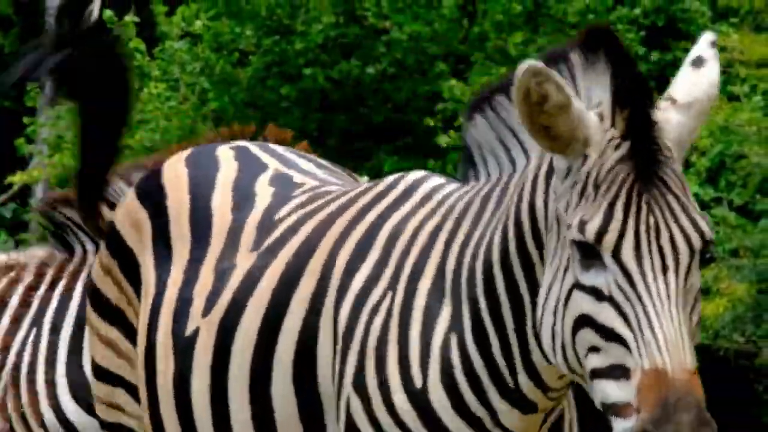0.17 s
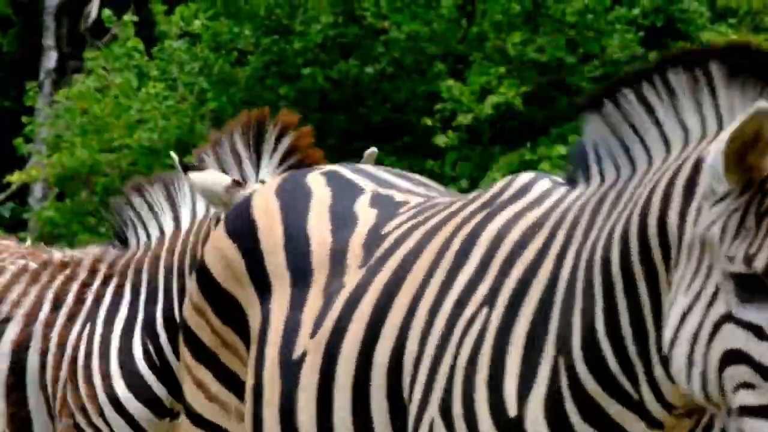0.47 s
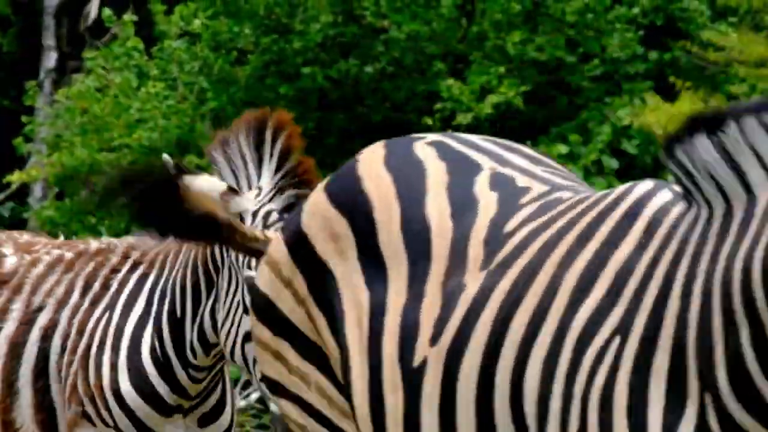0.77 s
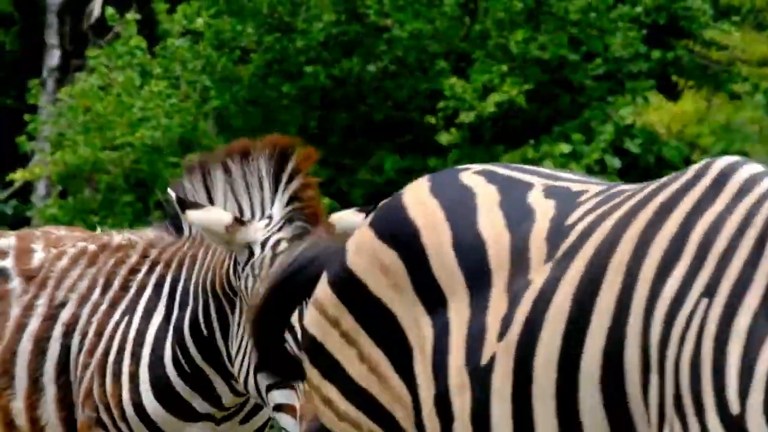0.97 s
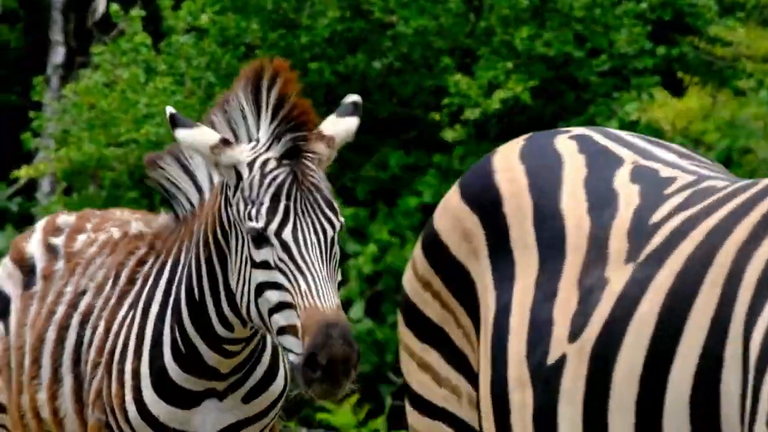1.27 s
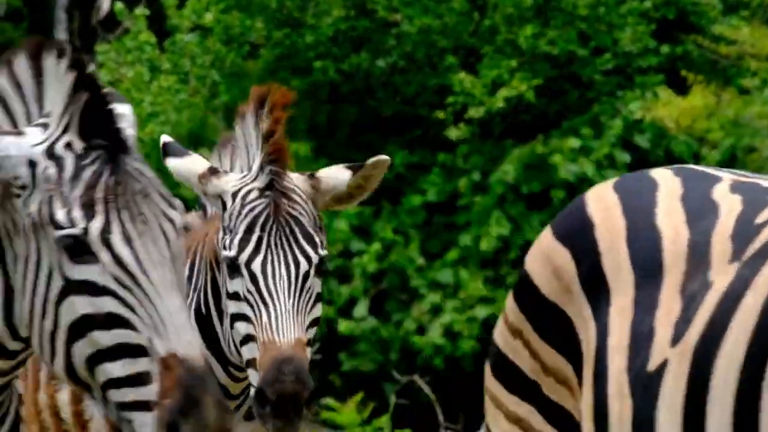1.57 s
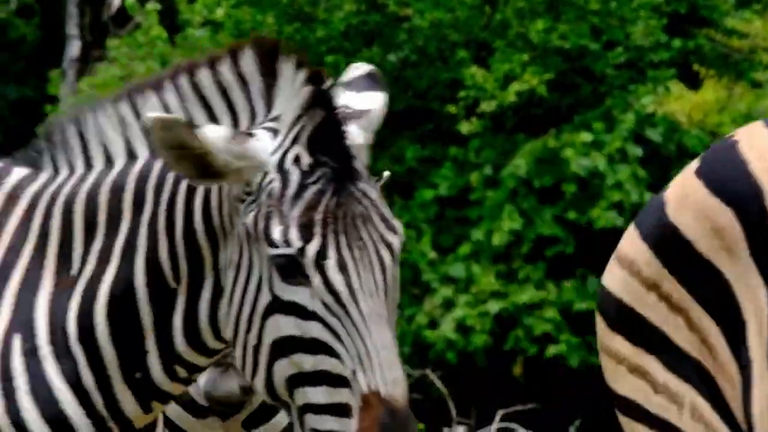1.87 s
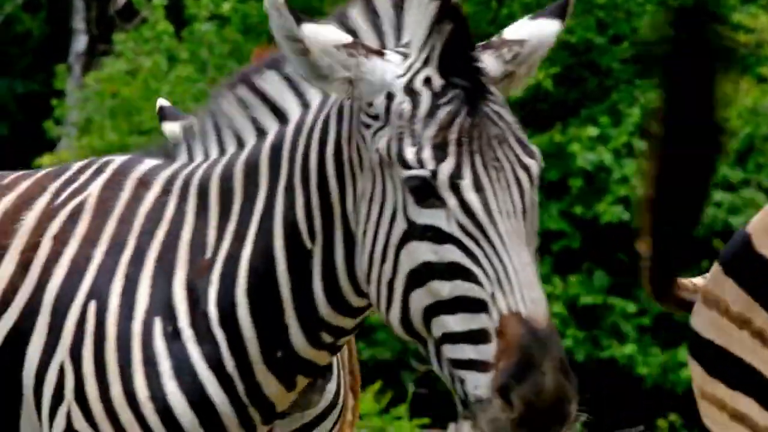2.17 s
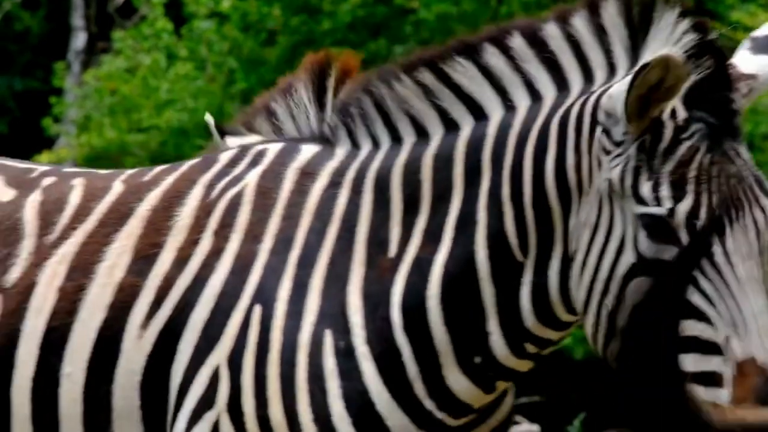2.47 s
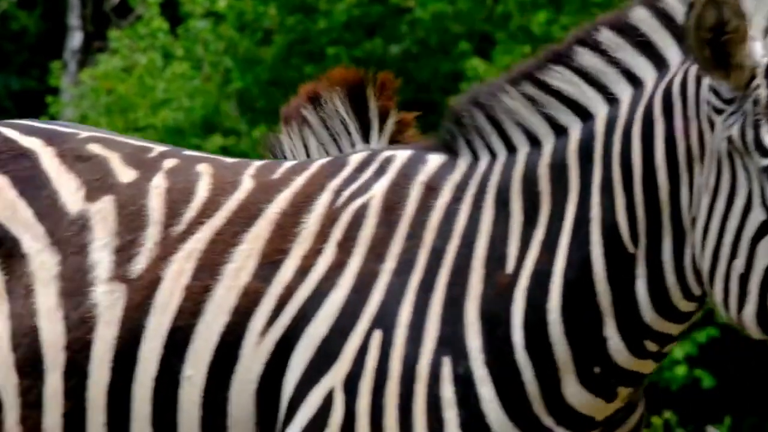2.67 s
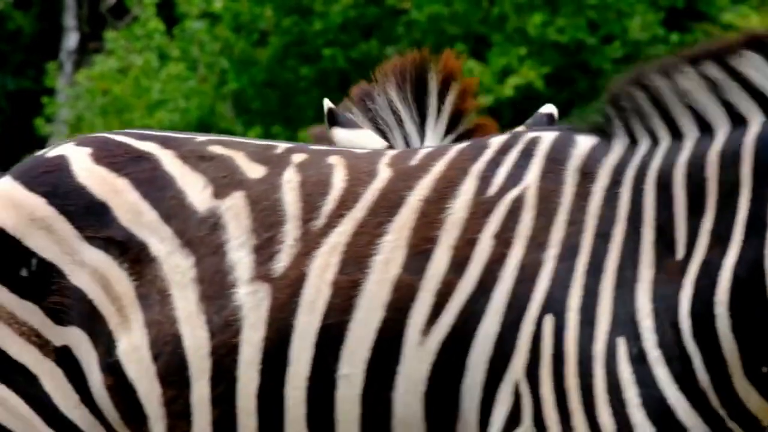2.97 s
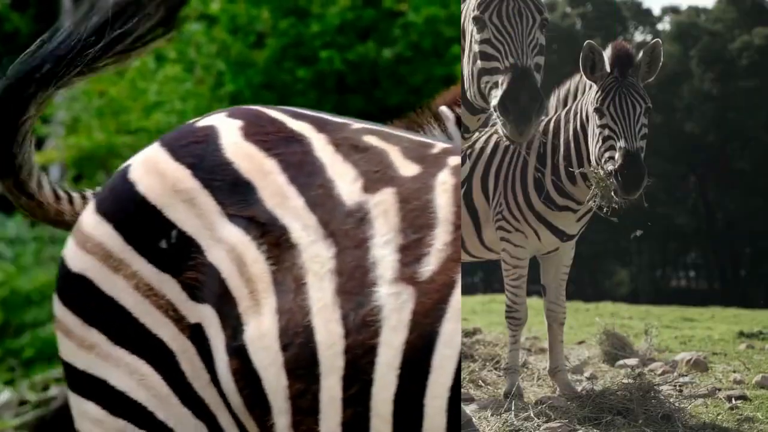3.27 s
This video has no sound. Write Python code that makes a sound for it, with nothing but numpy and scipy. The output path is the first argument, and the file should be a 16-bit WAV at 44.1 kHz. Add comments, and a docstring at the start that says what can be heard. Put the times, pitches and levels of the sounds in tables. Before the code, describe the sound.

Zebras give quick, high barks outdoors, straight ahead of the microphone. Each starts hoarse, swoops up, then fades or drops. The runs pause briefly and resume, sometimes overlapping, while small birds chirp far off over a soft hiss.

```python
"""Zebras bark outdoors in quick, overlapping runs. Each bark is a nearly pure tone that starts
hoarse, swoops up as much as an octave, holds, then fades or drops. Its overtones tear into noise
where the voice is rough, and a few barks carry a low grunt. The surroundings echo and ring a
little; small birds chirp far off over a soft hiss."""
import sys
import numpy as np
from scipy import signal
from scipy.fft import rfft, irfft, next_fast_len
from scipy.io import wavfile
from scipy.ndimage import uniform_filter1d, map_coordinates

SR = 44100
rng = np.random.default_rng(int(sys.argv[2]) if len(sys.argv) > 2 else 0)


def materialize(psi):
    """Save the field psi as 16-bit PCM at rate SR to the path in sys.argv[1].

    A 1-D psi becomes a single channel; in a 2-D psi each row is a channel.
    """
    bounded = np.clip(np.atleast_2d(psi).T, -1, 1)
    quanta = np.round(bounded * 32767).astype(np.int16)
    wavfile.write(sys.argv[1], SR, quanta)


N = 152145
T = np.arange(N) / SR


def amp(db):
    """dB to gain."""
    return 10 ** (np.asarray(db) / 20)


def unit(x):
    """Scale to rms 1."""
    return x / np.sqrt(np.mean(x ** 2) + 1e-20)


def along(points, hz):
    """Interpolate (freq_hz, value) rows on a log axis."""
    freq_hz, value = np.transpose(points)
    return np.interp(np.log(hz + 1), np.log(freq_hz + 1), value)


def wobble(knots_per_s):
    """Smooth random curve."""
    return map_coordinates(rng.standard_normal(4096), [T * knots_per_s], mode="wrap")


def filtered(x, response):
    """Apply the gain response(hz)."""
    size = next_fast_len(N + SR // 2)
    return irfft(rfft(x, size) * response(np.fft.rfftfreq(size, 1 / SR)), size)[..., :N]


def noise(response):
    """Coloured noise, rms 1."""
    return unit(filtered(rng.standard_normal(N), response))


def swell(start_s, length_s):
    """Smooth rise and fall."""
    return np.sin(np.pi * np.clip((T - start_s) / length_s, 0, 1)) ** 2


def patchy(x, depth_db):
    """Random time-frequency patches swell and sink; rms 1."""
    spectra = signal.stft(x, nperseg=512)[2]
    field = unit(uniform_filter1d(uniform_filter1d(rng.standard_normal(spectra.shape), 5, 0), 12, 1))
    return unit(signal.istft(spectra * amp(depth_db * field), nperseg=512)[1][:N])


def spread(a, b):
    """Two unrelated signals to stereo: near mono in the bass, wide in the treble."""
    # freq_hz, left_right_correlation
    likeness = [(100,0.96),(1200,0.95),(2200,0.96),(4000,0.2),(8000,0.13),(13000,.65)]
    angle = lambda hz: np.arccos(np.clip(along(likeness, hz), -1, 1)) / 2
    mid = filtered(a, lambda hz: np.cos(angle(hz)))
    side = filtered(b, lambda hz: np.sin(angle(hz)))
    return np.array([mid + side, mid - side])


def reverb(x):
    """Diffuse outdoor tail; each frequency dies at its own rate."""
    # freq_hz, t60_s
    decay = [(150,0.21),(1000,0.28),(2500,0.25),(8000,0.18)]
    hz, t, spectra = signal.stft(rng.standard_normal(SR // 2), SR, nperseg=256)
    impulse = signal.istft(spectra * amp(-60 * t / along(decay, hz)[:, None]), SR, nperseg=256)[1]
    return signal.fftconvolve(x, impulse / np.linalg.norm(impulse))[:N]


def surroundings(hz):
    """Response of the direct path, two resonances and two echoes."""
    # centre_hz, width_hz, level_db
    resonances = [(750,15,2.5),(450,23,0)]
    # delay_s, level_db
    echoes = [(.021,-15),(.056,-22)]
    rings = sum(amp(db) * 1j * hz * width / (centre ** 2 - hz ** 2 + 1j * hz * width)
                for centre, width, db in resonances)
    return 1 + rings + sum(amp(db) * np.exp(-2j * np.pi * hz * delay_s) for delay_s, db in echoes)


def background(hiss_db=-49):
    """Soft, shifting outdoor hiss with faint narrow-band swells."""
    # freq_hz, relative_db
    spectrum = [(25,-36.5),(45,-29.5),(85,-30.5),(125,-14.5),(170,-11),(450,-11.5),(750,-10),(1000,-10.5),(1250,-12.5),(2000,-9),(2650,-20),(3100,-15),(4500,-21),(7500,-28),(10000,-28),(12500,-23),(14400,-23)]
    # start_s, length_s, centre_hz, half_width_hz, level_db
    swells = [(.783,.18,1960,360,-46.5),(.777,.12,950,230,-48.5),(.7,.37,195,9.6,-54.5),(.55,.083,340,170,-41.5),(1.82,.11,2050,180,-48),(3.1,.16,1600,360,-48),(3.24,.15,3750,400,-56)]
    a, b = (patchy(noise(lambda hz: amp(along(spectrum, hz))), depth_db=4) for _ in range(2))
    out = amp(hiss_db) * spread(a, b)
    for start_s, length_s, centre_hz, half_width_hz, level_db in swells:
        band = noise(lambda hz: 1 / (1 + ((hz - centre_hz) / half_width_hz) ** 4))
        out += amp(level_db) * swell(start_s, length_s) * band
    return out


def birds(halo_per_sweep=0.24, reverb_db=-10):
    """Far chirps: thin sliding whistles, each in a halo of sound scattered by trees."""
    # start_s, length_s, start_hz, end_hz, level_db, scatter_ratio
    chirps = [(0.041,0.083,4760,3790,-57,1.5),(0.063,0.058,2163,2204,-40.5,0.47),(.085,0.16,3050,2940,-59.5,0.46),(0.528,0.14,5770,3774,-54,1.8),(1.626,0.12,5680,3785,-49,1.8),(1.91,0.075,5200,3800,-54,0.54),(3.218,0.12,5240,3635,-48,.8),(3.318,0.085,4900,4060,-54,.55),(3.318,0.025,1846,1970,-43,0.55)]
    out = np.zeros(N)
    for start_s, length_s, start_hz, end_hz, level_db, scatter_ratio in chirps:
        pitch_hz = np.exp(np.interp(T, [start_s, start_s + length_s], np.log([start_hz, end_hz])))
        phase = 2 * np.pi * np.cumsum(pitch_hz) / SR
        halo_hz = halo_per_sweep * abs(start_hz - end_hz) + 1 / length_s
        halo = unit(wobble(2 * halo_hz) * np.sin(phase) + wobble(2 * halo_hz) * np.cos(phase))
        whistle = unit(np.sqrt(2) * np.sin(phase) + scatter_ratio * halo)
        out += amp(level_db) * np.sqrt(swell(start_s, length_s)) * whistle
    return out + amp(reverb_db) * spread(reverb(out), reverb(out))


def grunts(thump_hz=213.3, thump_s=0.018, chest_hz=351.7, chest_s=0.095, lag_s=0.00098, jitter=0.041):
    """A short low thump, then a chesty ring."""
    # start_s, thump_db, chest_db
    events = [(1.412,-37.5,-40),(2.01,-70,-57),(2.249,-40.5,-40),(3.093,-38.5,-40.5)]
    warped_s = np.cumsum(1 + jitter * wobble(150)) / SR
    thump, chest = np.sqrt(2) * np.sin(2 * np.pi * np.outer([thump_hz, chest_hz], warped_s))
    return sum(amp(thump_db) * swell(start_s, thump_s) * thump
               + amp(chest_db) * swell(start_s + lag_s, chest_s) * chest
               for start_s, thump_db, chest_db in events)


def barks():
    """Gliding voice: unsteady below its break, hoarse around it, purer above; rasp pulses each cycle."""
    # One contour per bark: time_s, pitch_hz, level_db
    bark_1 = [(.214,505,-59.5),(.219,509,-32.5),(.233,606,-25),(.257,828,-29),(.263,897,-33),(.29,976.5,-25.5),(.307,980,-23),(.317,883,-35),(.33,750,-22.5),(.345,545,-30)]
    bark_2 = [(0.346,500,-43.5),(.363,506,-27),(0.377,521,-35.5),(.384,618,-29),(0.411,786,-21),(.427,790,-22),(.429,1002,-20.5),(.456,1083,-15.5),(0.495,1128,-17),(.525,1133,-23.5),(.534,916,-46.5),(.565,392,-43)]
    bark_3 = [(.593,434,-37.5),(.609,468,-27),(.613,632,-27.5),(0.639,827,-19),(0.655,847,-20.5),(0.656,1017,-19.5),(.676,1089,-14.5),(0.697,1144,-18),(.745,1159,-25.5),(.765,1168,-37)]
    bark_4 = [(1.01,456,-34.5),(1.016,606,-29),(1.028,710,-25),(1.043,810,-22),(1.049,929,-25.5),(1.067,1046,-15.5),(1.105,1109,-19.5),(1.12,1111,-25.5),(1.142,1108,-27.5),(1.15,770,-40)]
    bark_5 = [(1.218,488,-33),(1.245,729.6,-31.5),(1.262,833,-22),(1.276,984,-19.5),(1.295,1070,-19),(1.327,1109,-19),(1.337,1134,-27)]
    bark_6 = [(1.193,695,-33.5),(1.206,806.5,-28.5),(1.22,712,-27.5),(1.239,724.3,-22.5),(1.25,868,-22),(1.286,937.5,-26),(1.313,768,-27),(1.334,455,-35.5),(1.385,431,-52.5)]
    bark_7 = [(1.394,604,-43.5),(1.407,775,-26.5),(1.417,753,-32.5),(1.425,727,-23.5),(1.443,790,-22),(1.45,914,-23.5),(1.476,987,-29),(1.497,991,-22),(1.513,1000,-27)]
    bark_8 = [(1.669,450,-40.5),(1.68,593,-33),(1.697,747,-24.5),(1.717,830,-26.5),(1.724,985,-18.5),(1.742,1070,-17),(1.76,1089,-21.5),(1.776,1099,-18),(1.806,1105,-22.5),(1.828,1096,-41.5)]
    bark_9 = [(1.898,396,-43),(1.914,453,-28.5),(1.919,506,-37.5),(1.926,636.6,-26.5),(1.948,830,-22.5),(1.965,830,-21),(1.967,1013,-21.5),(1.996,1089,-22),(2.022,1074,-16),(2.061,1101,-40)]
    bark_10 = [(2.008,573,-43.5),(2.021,700.5,-27.5),(2.045,750,-22),(2.06,908,-19.5),(2.091,1029,-25.5),(2.117,1046,-17),(2.132,974,-28),(2.15,658,-32),(2.178,479,-43.5)]
    bark_11 = [(2.237,639,-41),(2.247,785,-24),(2.26,733,-32.5),(2.276,736,-24),(2.286,960.5,-21),(2.308,989,-24),(2.319,992,-33.5),(2.329,1080,-16),(2.34,1196,-27),(2.371,1113,-30),(2.394,1120,-39.5)]
    bark_12 = [(2.467,423,-42.5),(2.484,464,-34),(2.492,684,-34),(2.511,790,-25),(2.52,958,-30.5),(2.544,1015,-21),(2.586,985,-26.5),(2.615,1006,-23.5),(2.631,759,-36.5),(2.651,680,-47.5)]
    bark_13 = [(2.768,433,-43),(2.782,455,-34.5),(2.793,490,-34),(2.799,690,-33.5),(2.813,790,-26.5),(2.819,950,-33.5),(2.842,1030,-25.5),(2.868,1055,-35),(2.94,1065,-29.5),(2.995,1040,-29.5)]
    bark_14 = [(2.85,526,-41),(2.857,685,-30),(2.885,764.4,-22.5),(2.906,850,-28),(2.917,993,-25),(2.932,1045,-14.5),(2.943,1101,-26),(2.951,1148,-15),(2.963,1173,-37),(2.972,1089,-28.5),(2.978,1030,-20),(2.991,758,-31.5),(3.018,481,-41)]
    bark_15 = [(3.065,450,-49.5),(3.077,623.6,-36),(3.084,723.4,-29),(3.098,736,-30),(3.11,750,-23.5),(3.13,771,-25),(3.134,957,-25),(3.144,954,-30),(3.158,1025,-16.5),(3.185,1067,-23.5),(3.205,1042,-33.5)]
    contours = [bark_1, bark_2, bark_3, bark_4, bark_5, bark_6, bark_7, bark_8,
                bark_9, bark_10, bark_11, bark_12, bark_13, bark_14, bark_15]
    # Timbre per bark: octave_db (above the break), upper_db, rasp_db, roughness, mouth_cutoff_hz
    voices = [(6,-12,-30.5,0.08,2100),(-20.5,-13.5,-26.5,0,3100),(-22,-16.5,-22,0.12,3700),(-17,-15.5,-20,0.09,3050),(-14.5,-12,-17.5,0.02,3030),(-14.5,-17.5,-12.5,0.18,3000),(-14.5,-13,-14,.16,2670),(-14,-11,-16,0.05,2600),(-16.5,-16.5,-16.5,.07,2900),(-24.5,-14,-14.5,.13,2970),(-17.5,-16,-11.5,0.44,3400),(-10.5,-7,-30,0.1,1900),(-8,-26,-24,.08,3500),(-23,-21,-18,0.09,4600),(-25,-13,-12,.1,2700)]
    # Throat filter on the overtones: freq_hz, gain_db
    throat = [(900,0.5),(1250,0),(1600,-1),(2000,-3),(2200,-3.5),(2450,-2.5),(2680,-11),(3200,-14.5),(4000,-21),(6000,-33)]
    # freq_hz, relative_db
    rasp_spectrum = [(60,-70),(100,-43.5),(150,-8),(300,0.5),(550,0),(800,-7.5),(1200,8.5),(1500,3),(1800,-9),(2350,-13),(2900,-9),(4000,-30.5),(7000,-50),(14000,-54.5)]
    break_hz, break_width_hz = 850, 69
    hoarse_hz, hoarse_width_hz, hoarse_floor = 790, 177, 0.11
    low_octave_db, fall_octave_db, collapse_hz_per_s = -16, 5.5, 13000
    purer_db_per_s, rolloff_db, flicker_db = 148, 17.5, 3
    edge_s, rasp_blur_s = 0.003945, 0.016
    out = np.zeros(N)
    rasp = noise(lambda hz: amp(along(rasp_spectrum, hz)))
    jitter, flutter = wobble(240), wobble(180)
    overtones = [(k, wobble(410), wobble(110)) for k in range(2, 6)]
    for contour, (octave_db, upper_db, rasp_db, roughness, mouth_cutoff_hz) in zip(contours, voices):
        time_s, pitch_hz, knot_db = np.transpose(contour)
        on = (T > time_s[0] - edge_s) & (T < time_s[-1] + edge_s)
        t = T[on]
        hz, level_db = np.interp(t, time_s, pitch_hz), np.interp(t, time_s, knot_db)
        envelope = amp(level_db) * np.clip(np.minimum(t - t[0], t[-1] - t) / edge_s, 0, 1)
        # Voice state, each 0-1
        low = (1 - np.tanh((hz - break_hz) / break_width_hz)) / 2
        hoarse = hoarse_floor + (1 - hoarse_floor) * np.exp(-((hz - hoarse_hz) / hoarse_width_hz) ** 2)
        falling = np.clip(-np.gradient(hz, t) / collapse_hz_per_s, 0, 1)

        phase = 2 * np.pi * np.cumsum(hz * (1 + (0.052 * roughness + 0.024 * low) * jitter[on])) / SR
        since_break_s = np.maximum(t - t[np.argmax(hz > break_hz)], 0)
        purer_db = -purer_db_per_s * since_break_s * (1 - low)
        effort_db = 0.16 * (level_db - level_db.max()) * low  # overtones grow with effort
        # Hoarseness or a collapsing pitch tears the overtones into noise
        smear_rad = 0.23 + 2.4 * roughness * hoarse + 0.59 * falling
        second_db = octave_db + low * (low_octave_db + fall_octave_db * falling - octave_db)
        tone = np.sin(phase)
        for k, smear, flicker in overtones:
            db = second_db if k == 2 else upper_db - rolloff_db * (k - 3)
            db = db + purer_db + effort_db + along(throat, k * hz) + flicker_db * flicker[on]
            mouth_gain = 1 / (1 + (k * hz / mouth_cutoff_hz) ** 10)
            tone += np.sqrt(2) * amp(db) * mouth_gain * np.sin(k * phase + smear_rad * smear[on])
        flutter_depth = (roughness + 0.1 * low) * hoarse
        out[on] += np.sqrt(2) * envelope * tone * (1 + flutter_depth * flutter[on])

        airflow = np.zeros(N)
        airflow[on] = envelope * amp(rasp_db) * (hoarse + 0.35 * falling)
        hiss = rasp * uniform_filter1d(airflow, int(rasp_blur_s * SR))  # leads and outlasts the tone
        hiss[on] *= 1 + 0.4 * np.sin(phase)
        out += hiss
    return out


def scene(reverb_db=-16, side_db=-24.5):
    """Zebras straight ahead, birds and hiss all around."""
    calls = barks() + grunts()
    wet = reverb(calls) + amp(side_db) * np.outer([1, -1], reverb(calls))
    return filtered(calls, surroundings) + amp(reverb_db) * wet + birds() + background()


def record(dry, shelf_hz=118, top_hz=14450):
    """Low shelf thins the deep bass; hard cut above top_hz."""
    return filtered(dry, lambda hz: (0.22 + 0.74 / (1 + (shelf_hz / (hz + 1)) ** 20)) * (hz < top_hz))


dry = scene()
out = record(dry)
materialize(out)
```